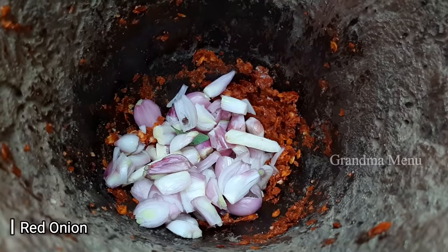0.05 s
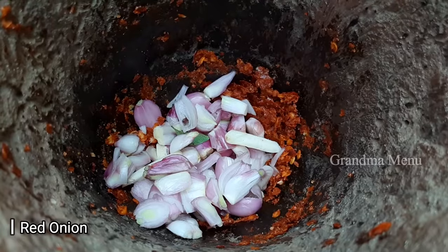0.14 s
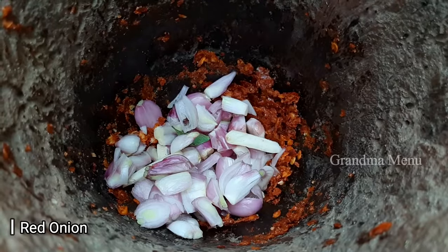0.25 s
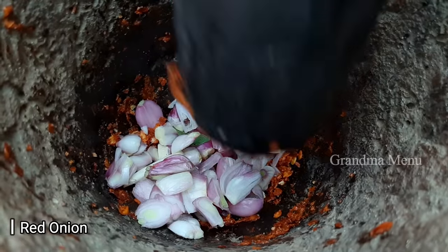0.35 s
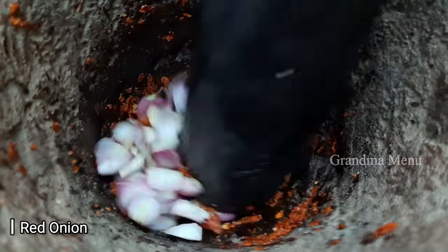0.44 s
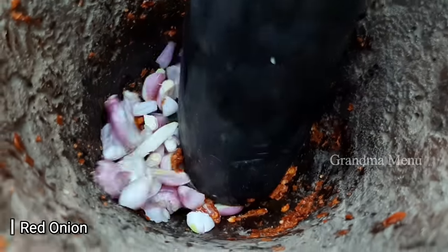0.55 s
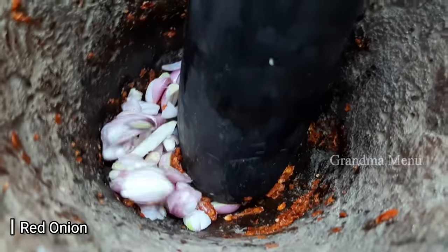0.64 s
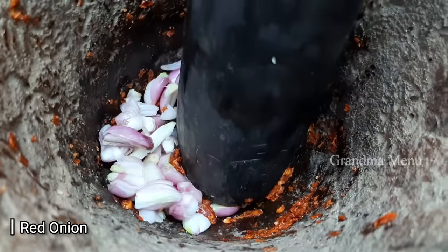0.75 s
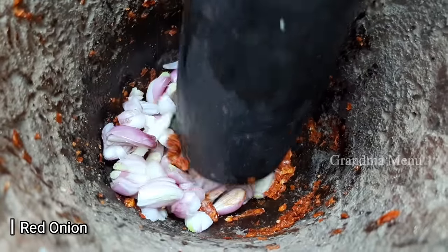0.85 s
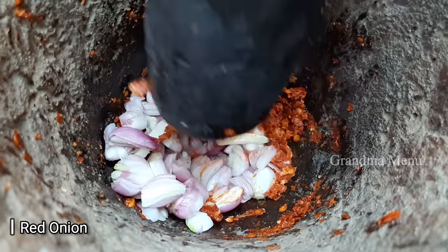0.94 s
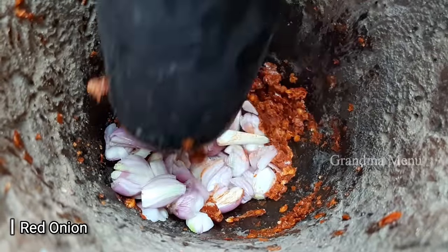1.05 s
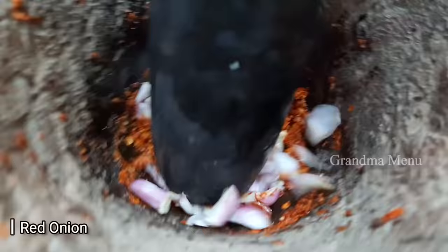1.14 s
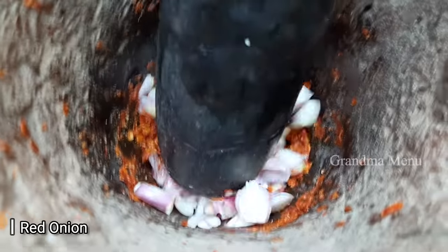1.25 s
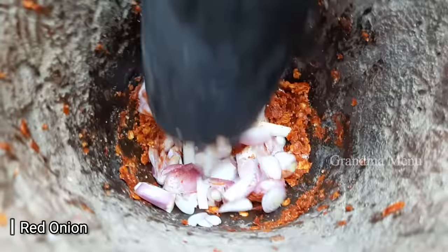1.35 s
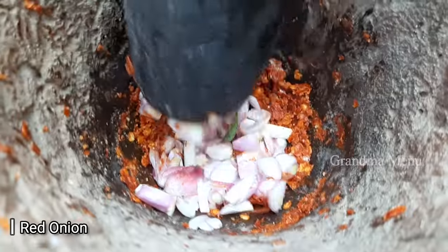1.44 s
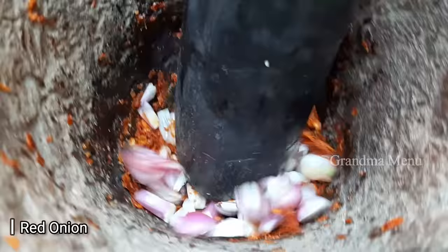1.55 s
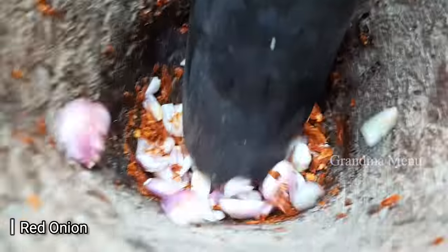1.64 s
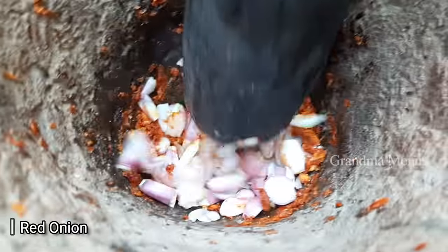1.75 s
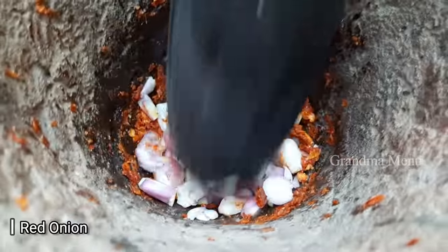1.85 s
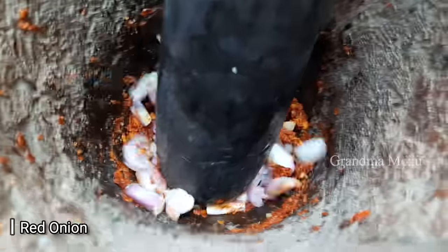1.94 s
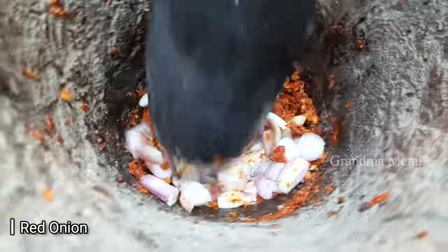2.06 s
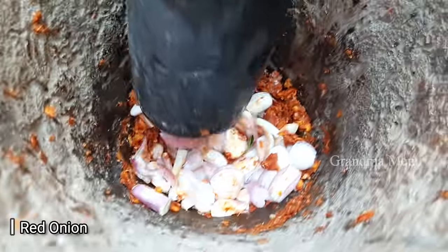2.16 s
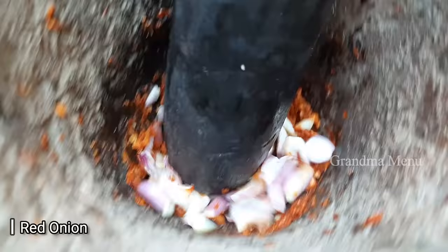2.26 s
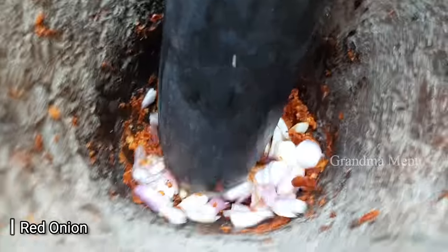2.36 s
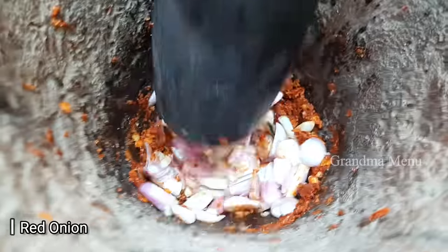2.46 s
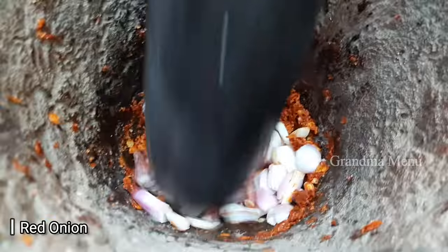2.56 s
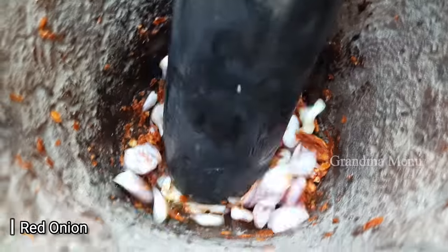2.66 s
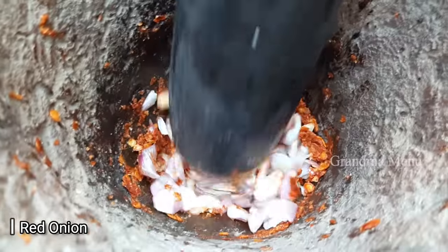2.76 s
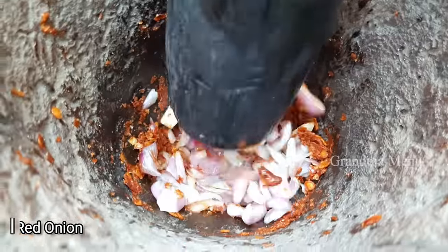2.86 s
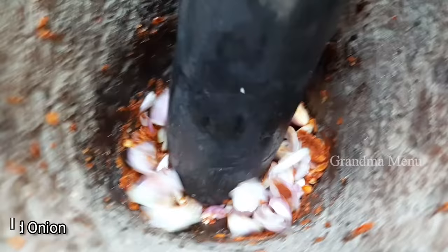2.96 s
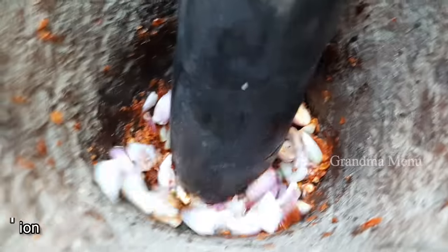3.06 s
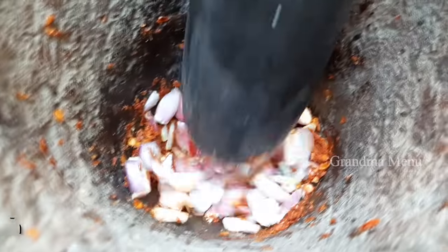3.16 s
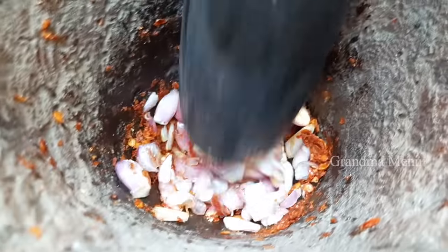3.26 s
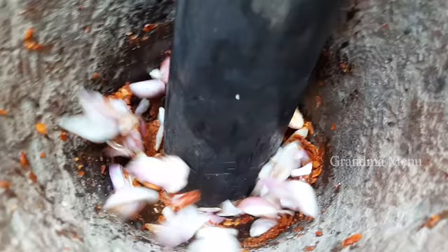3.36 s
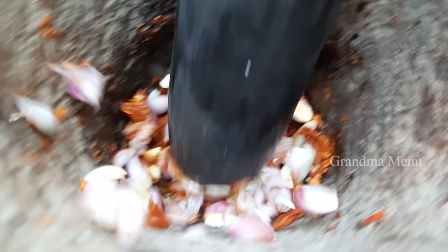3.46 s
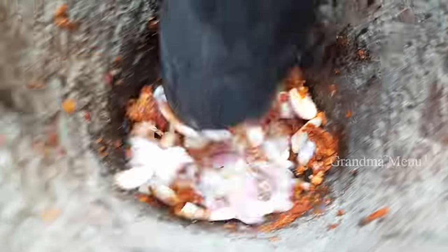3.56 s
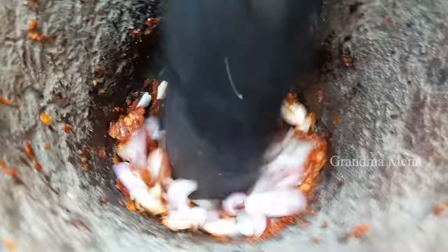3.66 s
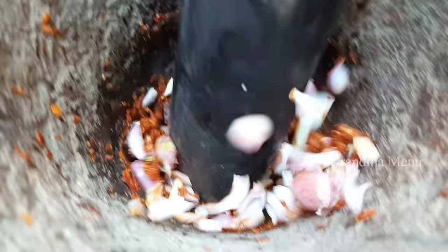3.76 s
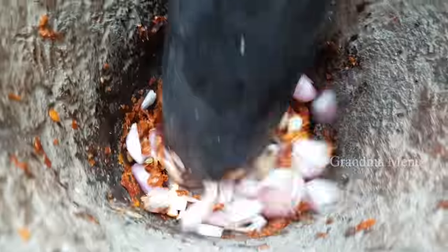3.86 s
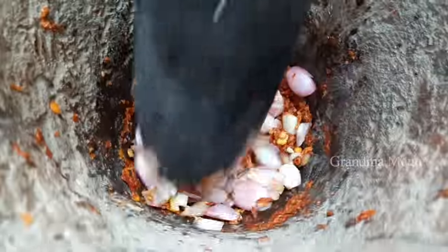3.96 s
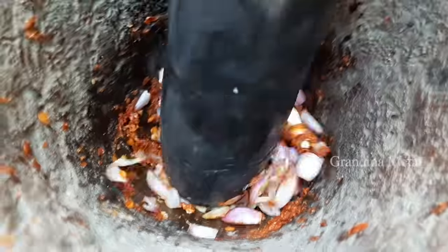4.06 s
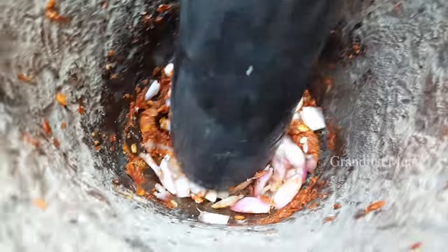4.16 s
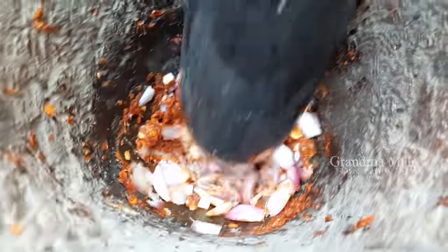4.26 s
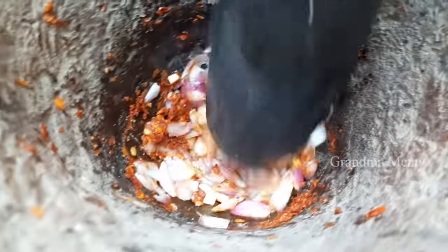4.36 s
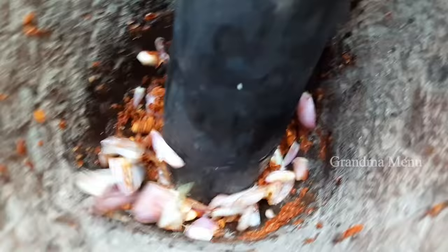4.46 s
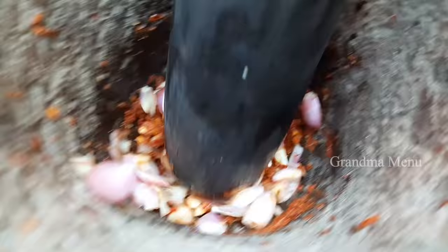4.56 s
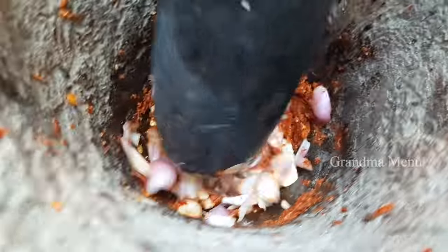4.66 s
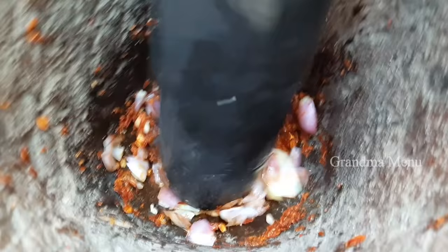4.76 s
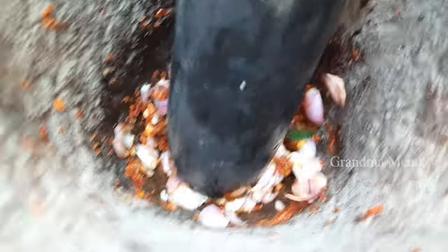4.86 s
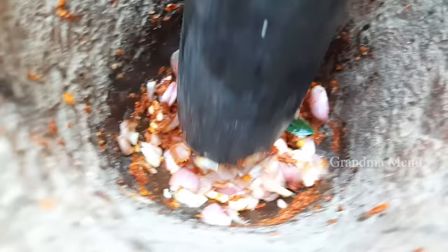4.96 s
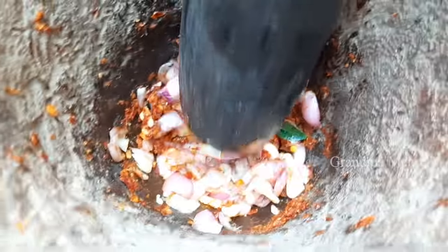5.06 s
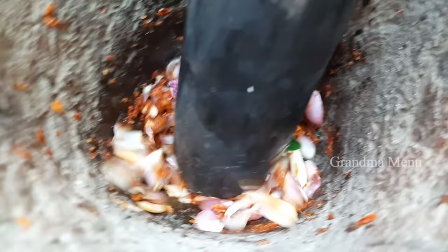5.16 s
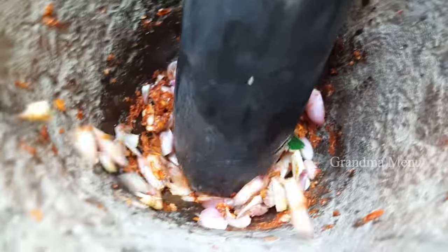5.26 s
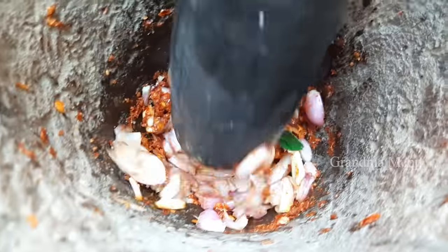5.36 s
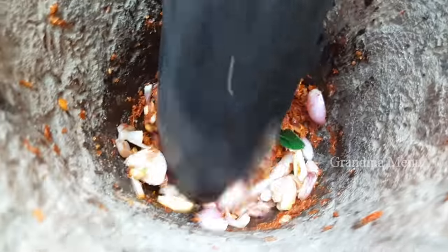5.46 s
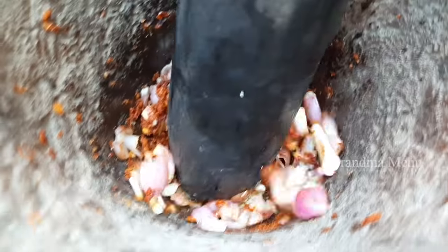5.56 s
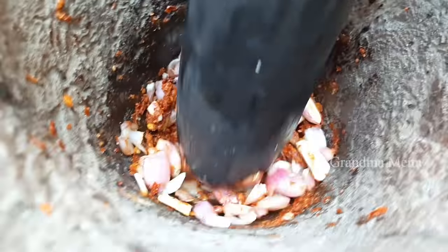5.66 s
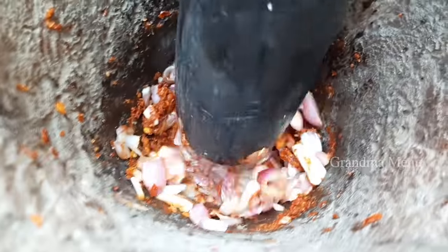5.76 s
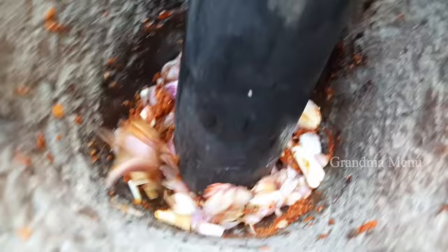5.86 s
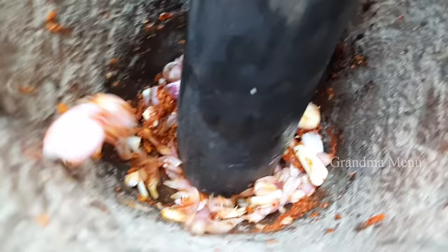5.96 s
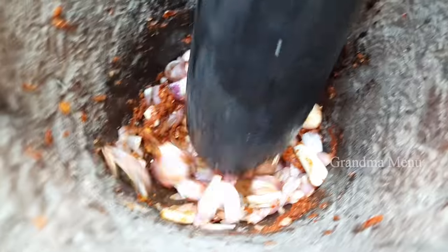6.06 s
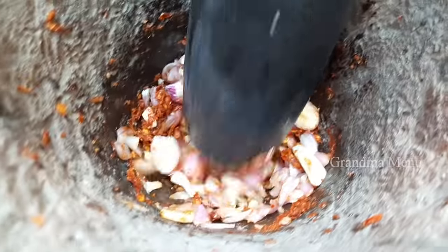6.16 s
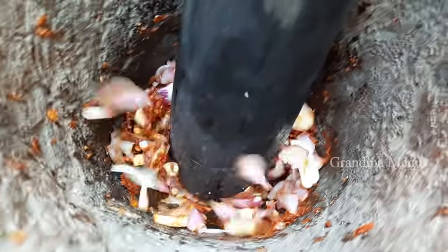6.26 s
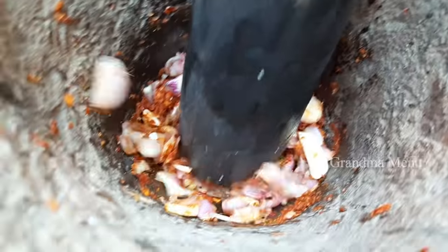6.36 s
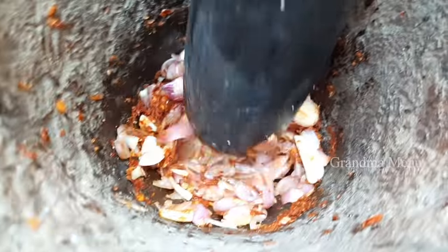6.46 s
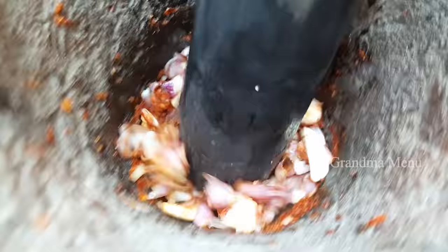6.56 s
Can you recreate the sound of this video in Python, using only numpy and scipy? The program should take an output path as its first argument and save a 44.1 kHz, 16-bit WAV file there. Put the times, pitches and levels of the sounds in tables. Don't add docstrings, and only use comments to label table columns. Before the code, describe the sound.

A heavy wooden pestle pounds wet onion and chilli in a stone mortar, with crunchy squashes, dull thumps and a few hollow woody knocks outdoors.

```python
import sys
import numpy as np
from scipy import signal
from scipy.fft import rfft, irfft, next_fast_len
from scipy.io import wavfile

SR = 44100
rng = np.random.default_rng(int(sys.argv[2]) if len(sys.argv) > 2 else 0)


def to_wav(sig):
    pcm = np.clip(np.atleast_2d(sig), -1, 1) * 32767
    pcm = np.round(pcm).astype(np.int16)
    wavfile.write(sys.argv[1], SR, pcm.T)


def amplitude_ratio(level_db):
    exponent = np.asarray(level_db, float) / 20
    return 10 ** exponent


N = 291501
LONG = next_fast_len(N)
HZ = np.maximum(np.arange(LONG // 2 + 1) * SR / LONG, 1)

# [t/s, level/dB]
OPENNESS = [(0, -51.5), (.55, -51.5), (.8, -55), (1.15, -56.5), (1.55, -52.5), (1.73, -59.5), (2.2, -63.5),
            (2.5, -63), (3.05, -64.5), (3.7, -57), (4.0, -57.5), (4.2, -54), (4.75, -55), (5.2, -53),
            (5.8, -54), (6.61, -56.5)]
# [f/Hz, density/dB per Hz]
RUMBLE = [(15, -45), (25, -2), (54, 0), (82, -0.5), (179, -13), (243, -16.5), (379, -22.5), (508, -20),
          (700, -29.5), (910, -25), (1540, -120)]
AIR = [(180, -31), (300, -13.5), (388, -17.5), (466, -2), (515, -39), (848, -17), (1520, -1.5), (1880, -2),
       (2430, 2), (2650, -1.5), (4110, -6), (5470, -5), (5960, -8), (7900, -14.5), (8400, -24),
       (11700, -17), (19800, -120)]
HISS = [(4410, -20.5), (7500, -9), (8970, -22), (11400, -12.5), (12600, -15.5), (15100, -14.5),
        (15900, -20), (16300, -11.5)]
# [f/Hz, likeness 0..1]
LIKENESS = [(60, 0.97), (180, 0.75), (550, 0.58), (1650, 0), (4970, 0), (15000, 0)]
# [start t/s, length/s, level/dB]
CHORUS_BURSTS = [
    (-.03, .12, -49),
    (0.324, .22, -46.5),
    (0.666, 0.11, -53),
    (1.618, .12, -57),
]
# [start t/s, end t/s, first f/Hz, last f/Hz, level/dB]
SONGS = [(-.02, .05, 14200, 13300, -68), (.01, .085, 15400, 12800, -68), (-.2, .5, 5470, 5450, -70),
         (.6, 1.0, 5430, 5400, -69), (.9, 1.2, 13050, 12850, -75), (1.0, 1.48, 12150, 12400, -69),
         (.8, 1.5, 15000, 14980, -73), (1.2, 1.5, 15330, 15330, -74), (3.7, 4.6, 2270, 2330, -66),
         (4.85, 5.6, 2270, 2390, -67), (5.5, 6.0, 5480, 5460, -66), (5.6, 5.95, 5170, 5170, -72),
         (5.95, 6.7, 5430, 5320, -70), (5.6, 6.7, 2280, 2150, -70)]
# [t/s, level/dB]
BUZZ = [(0, -58.5), (.3, -56.5), (.6, -55), (.8, -54), (1.0, -46.5), (1.15, -52.5), (1.3, -48.5),
        (1.5, -57.5), (1.7, -95)]
# [f/Hz, width/Hz, level/dB]
BUZZ_BODY = [(1780, 270, -4.5), (2284, 150, 15), (2500, 180, 7), (2740, 84, -5), (4714, 300, -31),
             (5230, 300, -6.5), (6960, 470, -10.5), (10360, 400, -25.5)]
# [t/s, peak level/dB,
# f/Hz]
THUMPS = [(0.5023, -20.5, 88), (0.6302, -30.5, 83), (1.192, -24.5, 63), (1.595, -33, 93.5),
          (1.69, -42.5, 215), (1.937, -15.5, 94), (2.0784, -32, 65), (2.3126, -30.5, 74),
          (2.4765, -41.5, 72), (2.661, -18, 97), (2.737, -35, 88.5), (3.039, -21, 73), (3.395, -18, 79),
          (3.5491, -39.5, 76), (3.753, -21, 74.4), (3.9065, -28.5, 71), (4.013, -42.5, 66),
          (4.095, -16.5, 73), (4.5, -27.5, 63.5), (4.658, -30.5, 74.6), (4.832, -13.5, 84.6),
          (5.2104, -26.5, 77.5), (5.5523, -24, 92), (5.925, -20, 69), (6.047, -36, 79),
          (6.291, -19.5, 69.4)]
# [t/s, peak level/dB, f/Hz]
TICKS = [
    (2.7294, -24, 1500),
    (3.1401, -18.5, 4620),
    (3.6894, -30.5, 2500),
    (4.2982, -19, 4310),
    (5.6067, -21, 1530),
    (5.6869, -25.5, 1920),
]
# [t of full pressure/s, lead-in/ms, crackle level/dB rms, dying/ms, dull squash minus crackle/dB]
CRUSH = [(0.512, 38, -35, 42, 8.5), (1.170, 22, -43.5, 12, -6), (1.191, 19, -31.5, 46.5, -4),
         (1.583, 37, -30, 32, -8), (1.942, 11, -37.5, 54.5, 9.5), (2.319, 35, -34.5, 17.4, -3),
         (2.662, 4, -30, 33, 11), (3.034, 22.6, -25, 6, -0.5), (3.395, 12, -17, 2.4, -4.5),
         (3.731, 19, -40, 10, -3), (3.746, 12, -20, 8.1, -13), (4.088, 18, -33, 17, -18),
         (4.108, 15, -33, 21, -1), (4.467, 42, -38, 21, -6.5), (4.488, 22, -34, 23, -6),
         (4.837, 17.2, -28, 33, 3), (5.188, 40, -36, 16, -7.5), (5.205, 9.1, -21.5, 4.4, -6.5),
         (5.556, 8.5, -20, 18.3, -6), (5.92, 9.5, -17, 9.6, -7.5), (6.273, 23, -34, 11, -3.5),
         (6.288, 14.4, -19.5, 5.1, -5), (6.62, 58, -43, 17, -16)]
# [f/Hz, density/dB per Hz]
CRACKLE = [(880, -26.5), (1500, -1.5), (2870, -15), (3170, -8.5), (4280, -5), (4730, 0.5), (5220, -6.5),
           (9900, -10), (11500, -7), (14600, -7.5), (16300, -7)]
SQUASH = [(150, -37), (300, -17.5), (420, -9.5), (570, -4.5), (800, 9), (1500, 7), (2500, -4.5), (3500, -8),
          (5000, -42)]
# [t/s, ring level/dB, push level/dB, crack level/dB, left minus right/dB]
KNOCKS = [(0.481, -6, -47, -14, 9), (0.503, -8, -10.5, -20, -5), (0.508, -8, -28, -33, -1),
          (1.183, -39, -22, -28, 2), (1.501, -39, -46, -50, -6), (1.583, -32, -44, -27, 1.5),
          (1.942, -2, -12, -11, -4), (1.947, -18, -19, -28, 4.5), (2.294, -24.5, -36, -51, -9),
          (2.316, -43, -48, -28, 0.5), (2.663, -7.5, -3.5, -11, 2), (2.668, -1.5, -20.5, -16.5, -1.5),
          (3.032, -57, -33.5, -34, 0), (3.394, -34, -20, -44, 0.5), (3.743, -34, -23.5, -21, 1),
          (4.09, -29, -18.5, -21.5, 5), (4.49, -47, -76, -33, -1), (4.834, -3.5, -11, -16, 2),
          (5.202, -40, -68, -28, -1.5), (5.557, -27, -23, -55, 0), (5.916, -39, -18, -39, -1.5),
          (6.285, -35, -22.5, -46.5, -2)]
# [f/Hz, level/dB, t60/s]
PESTLE_MODES = [(296, -3.5, 0.16), (388, -6.5, .06), (447, -13, .06), (556.6, -12.5, .12), (581, -2, 0.15),
                (735, -2, .025), (861, -8, .06), (923, 1, 0.09), (1100.3, -7.5, 0.019), (1300, -14.5, .05),
                (1516, -7, 0.14), (1710, -15.5, .06), (2040, -16, .06), (2300, -18, .04)]

HISS_BELOW_DB, GATE_DB, GATE_SLOPE = 6, -55.5, 4.2
HISS_FOLLOWS = 0.45
CHORUS_DB, CHORUS_FADE_S = 8, 1.5
RUMBLE_DB, RUMBLE_FOLLOWS = -54, .3
SHAKE_DB, SHAKE_T60_S = -27.5, 0.3
CHORUS_BURST_HZ = 11500
UNSTEADY_HZ = 65
BUZZ_HZ = 146.4
HARD_DB, HARD_HELD_MS, HELD_MS_PER_DB = -16, 2.2, 0.34
KNEE_DB = -12.5
GRIND_DB, GRIND_T60_S = -24.0, .022
BARE_DB, PADDED_SHARE = -20, .45
RING_LEAD_S, SQUASH_LEAD_S, CRUSH_LEAD_S = .00025, .0003, .00036
SELF_NOISE_DB, SELF_NOISE_HZ = -74.0, 11000
TOP_CUT_HZ = 15950


def rms_one(x):
    return x / np.sqrt(np.mean(x ** 2) + 1e-20)


def in_time(rows):
    s, *columns = np.transpose(rows)
    return [np.interp(np.arange(N) / SR, s, c) for c in columns]


def at_hz(points, hz):
    f, value = np.transpose(points)
    return np.interp(np.log(hz), np.log(f), value)


def clicks(times, heights):
    out = np.full(N, 1e-18)
    out[np.minimum((np.asarray(times) * SR).astype(int), N - 1)] = heights
    return out


def ring(x, hz, t60):
    r, w = amplitude_ratio(-60 / (t60 * SR)), 2 * np.pi * hz / SR
    return signal.lfilter([0, np.sin(w)], [1, -2 * r * np.cos(w), r * r], x)


def soften(x, hz):
    r = np.exp(-2 * np.pi * hz / SR)
    return signal.lfilter([(1 - r) ** 2], [1, -2 * r, r * r], x)


def drift(hz):
    slow = soften(rng.standard_normal(N // 20 + 1001), 20 * hz)[1000:]
    return rms_one(slow.repeat(20)[:N])


def coloured(x, spectrum):
    return rms_one(irfft(rfft(x, LONG) * amplitude_ratio(at_hz(spectrum, HZ)), LONG)[..., :N])


def delayed(x, s):
    return np.roll(x, round(s * SR))


def highpass(x, order, hz):
    return signal.sosfilt(signal.butter(order, hz, "high", fs=SR, output="sos"), x)


def at_knocks_db():
    s, *_, lean_db = np.transpose(KNOCKS)
    return np.interp(np.arange(N) / SR, s, lean_db)


def two_ports(x, lead_s, wall_db, shift_db):
    left = amplitude_ratio((at_knocks_db() + shift_db) / 2)
    out = np.array([left * x, delayed(x, lead_s) / left])
    for k, lag in enumerate(np.geomspace(.0009, .05, 8)):
        sign = (-1) ** (k // 2)
        out[k % 2] += amplitude_ratio(wall_db - 680 * lag) * sign * delayed(x, lag)
    return out


def wide_noise(spectrum, patchy_db):
    mid, side = rfft(rng.standard_normal((2, LONG)))
    alike = np.clip(at_hz(LIKENESS, HZ), -1, 1)
    pair = np.sqrt(1 + alike) * mid + np.sqrt(1 - alike) * side * [[1], [-1]]
    noise = irfft(pair * amplitude_ratio(at_hz(spectrum, HZ)), LONG)[:, :N]
    return rms_one(noise) * amplitude_ratio(patchy_db * drift(1.9))


def surroundings():
    air_db, = in_time(OPENNESS)
    over = air_db - GATE_DB
    chorus_db = CHORUS_DB * np.clip(1 - (np.arange(N) / SR / CHORUS_FADE_S) ** 4, 0, 1)
    follow_db = HISS_FOLLOWS * np.maximum(over, 0) + GATE_SLOPE * np.minimum(over, 0)
    hiss_db = GATE_DB - HISS_BELOW_DB + follow_db + chorus_db
    s, thump_db, _ = np.transpose(THUMPS)
    jolts = clicks(s + 0.016, amplitude_ratio(thump_db + SHAKE_DB))
    shake = signal.lfilter([1], [1, -amplitude_ratio(-60 / (SHAKE_T60_S * SR))], jolts)
    rumble = amplitude_ratio(RUMBLE_DB + RUMBLE_FOLLOWS * over) + shake
    return (rumble * wide_noise(RUMBLE, patchy_db=1.5)
            + amplitude_ratio(air_db) * wide_noise(AIR, patchy_db=2.24)
            + amplitude_ratio(hiss_db) * wide_noise(HISS, patchy_db=3.4))


def chorus_bursts():
    t, swell = np.arange(N) / SR, np.zeros(N)
    for s, length, level_db in CHORUS_BURSTS:
        swell += amplitude_ratio(level_db) * np.sin(np.pi * np.clip((t - s) / length, 0, 1)) ** 1.2
    return swell * rms_one(highpass(rng.standard_normal((2, N)), 3, CHORUS_BURST_HZ))


def songs():
    out, waver, flicker = np.zeros((2, N)), drift(60), drift(20)
    for k, (start, end, first_hz, last_hz, level_db) in enumerate(SONGS):
        span = slice(max(int(start * SR), 0), int(end * SR))
        share = np.clip((np.arange(N)[span] / SR - start) / (end - start), 0, 1)
        hz = first_hz + (last_hz - first_hz) * share + UNSTEADY_HZ * np.roll(waver, 9000 * k)[span]
        song_db = level_db + 5 + 3 * np.roll(flicker, 7000 * k)[span]
        swell = np.abs(np.sin(np.pi * share)) ** .6 * amplitude_ratio(song_db)
        direction = rng.uniform(0, 1.6, (2, 1))
        out[:, span] += swell * np.sin(2 * np.pi * np.cumsum(hz) / SR + direction)
    return out


def insect():
    beats = np.diff(np.floor(np.arange(N) * BUZZ_HZ / SR), prepend=0) + 1e-18
    body = np.zeros(N)
    for hz, width, db in BUZZ_BODY:
        t60 = 1.5 / width
        twice = ring(ring(beats, hz, t60), hz, t60)
        body += amplitude_ratio(db) * np.sqrt(width) * twice * width / SR * 20
    bug = amplitude_ratio(in_time(BUZZ)[0] - 1.5 + 1.9 * drift(16)) * rms_one(body)
    return np.array([bug, delayed(bug, .00011)])


def ground():
    out, t = np.zeros(N), np.arange(SR // 5) / SR
    for s, level_db, hz in THUMPS:
        swell = amplitude_ratio(level_db - 850 * t) * (1 - np.exp(-t / 0.0022))
        out[int((s + .0035) * SR):][:len(t)] += swell * np.sin(2 * np.pi * hz * t)
    return out * amplitude_ratio(np.array([[2.3], [-2.3]]))


def pieces():
    s, level_db, _ = np.transpose(TICKS)
    snap = signal.lfilter([1, -1], [1, -.3], clicks(s, amplitude_ratio(level_db - 10.5)))
    return snap + sum(ring(clicks(s, amplitude_ratio(db - 11.5)), hz, 0.0032) for s, db, hz in TICKS)


def grains(per_s, pitches_hz, cycles, spread_db):
    sizes = amplitude_ratio(spread_db * np.minimum(rng.exponential(1, N), 4)) * rng.choice([-1, 1], N)
    born = rng.random(N) < per_s / SR
    dealt = rng.integers(0, len(pitches_hz), N)
    out = np.zeros(N)
    for k, hz in enumerate(pitches_hz):
        bursts = sizes * born * (dealt == k) + 1e-18
        out += np.sqrt(hz) * ring(bursts, hz, cycles / hz) / np.sqrt(hz / 3000 + 1)
    return out


def crushing():
    t, bright, dull = np.arange(N) / SR, np.zeros(N), np.zeros(N)
    for s, lead, level_db, dying, squash_db in CRUSH:
        held = max(HARD_HELD_MS + HELD_MS_PER_DB * (HARD_DB - level_db), 1)
        for layer, offset_db, slower in ((bright, 0, .8), (dull, squash_db, 1.2)):
            steps_ms = [-lead - 4, 4, 0.74 * lead, .25 * lead, held, slower * dying, slower ** 2 * 78.0]
            marks = s + np.cumsum(steps_ms) / 1000
            span = slice(int(marks[0] * SR), int(marks[-1] * SR))
            pressure_db = np.interp(t[span], marks, [-50, -30, KNEE_DB, 0, -2, -24, -60])
            layer[span] += amplitude_ratio(level_db + offset_db + pressure_db)
    lumps = amplitude_ratio(3.5 * drift(170))
    crackle = coloured(grains(16000, np.geomspace(1500, 16000, 22), cycles=2.9, spread_db=3.0), CRACKLE)
    squash = coloured(grains(6000, np.geomspace(300, 3200, 11), cycles=1.1, spread_db=-0.5), SQUASH)
    return lumps * bright * crackle, lumps * dull * squash


def pestle():
    s, ring_db, push_db, crack_db, _ = np.transpose(KNOCKS)
    luck = rng.normal(0, 2.5, (len(s), len(PESTLE_MODES)))
    bare = ring_db > BARE_DB
    out = np.zeros(N)
    for k, (hz, level_db, t60) in enumerate(PESTLE_MODES):
        strength_db = ring_db - 10.5 if hz < 1100 else crack_db + 9.5
        heights = amplitude_ratio(strength_db + level_db + luck[:, k])
        out -= ring(clicks(s, heights * bare), hz, t60)
        out -= ring(clicks(s, heights * ~bare), hz, PADDED_SHARE * t60)
    push = clicks(s + 0.0012, amplitude_ratio(push_db + 1.0))
    return soften(out, 6700) + ring(push, 190, 0.021) + amplitude_ratio(-4.5) * ring(push, 279.4, 0.03)


def scene():
    behind = surroundings() + chorus_bursts() + songs() + insect()
    crackle, squash = crushing()
    squash = squash + amplitude_ratio(GRIND_DB) * ring(squash, PESTLE_MODES[4][0], GRIND_T60_S)
    crush = two_ports(crackle + pieces(), CRUSH_LEAD_S, wall_db=-4.5, shift_db=1.0)
    crush += two_ports(squash, SQUASH_LEAD_S, wall_db=-24.0, shift_db=4.6)
    knocks = two_ports(pestle(), RING_LEAD_S, wall_db=-28.5, shift_db=4.7)
    return behind + ground() + amplitude_ratio(5.0) * crush + knocks


def low_pass(x):
    return signal.sosfilt(signal.butter(12, 16860, fs=SR, output="sos"), x)


def record(dry):
    own = highpass(rng.standard_normal(dry.shape), 4, SELF_NOISE_HZ)
    x = .97 * np.tanh((dry + amplitude_ratio(SELF_NOISE_DB) * own) / .97)
    x = highpass(x, 4, 44)
    x = signal.sosfilt(signal.ellip(10, 1, 65, TOP_CUT_HZ, fs=SR, output="sos"), x)
    return low_pass(x)


dry = scene()
out = record(dry)
to_wav(out)
```